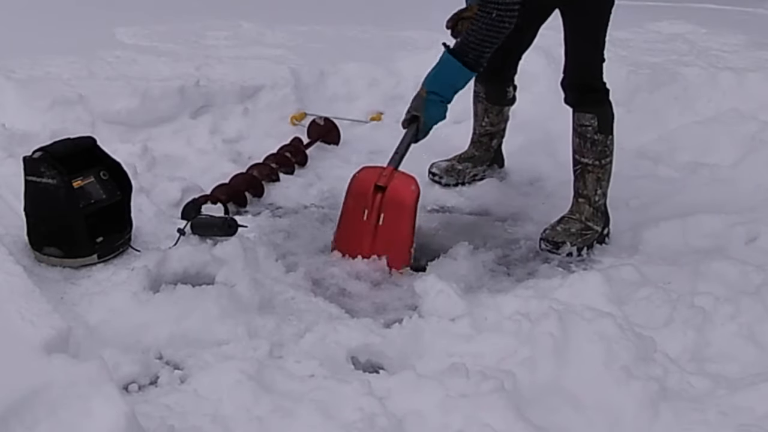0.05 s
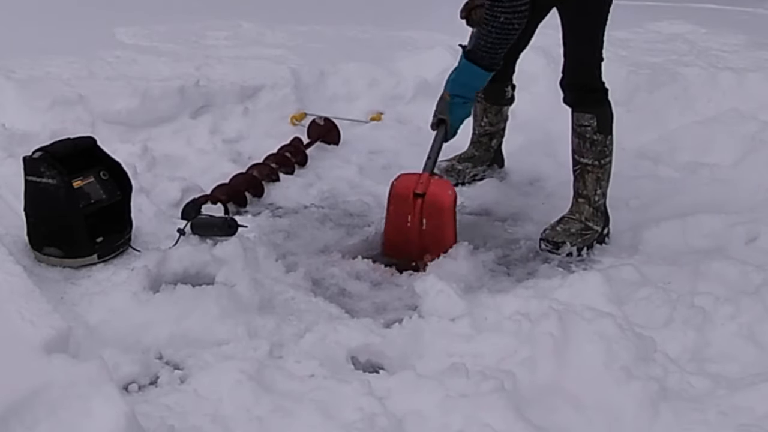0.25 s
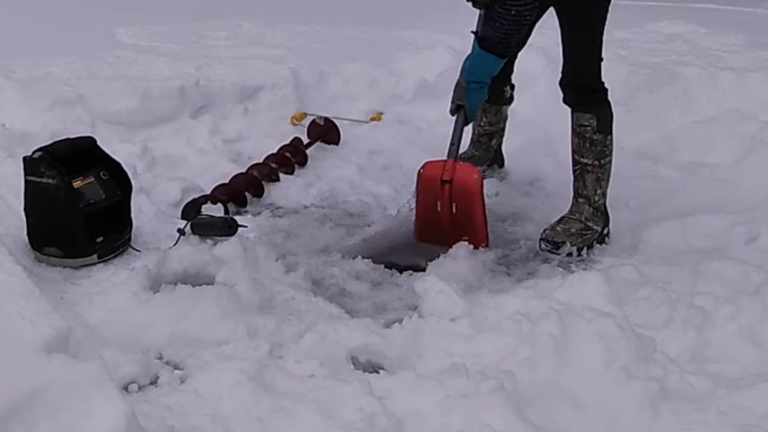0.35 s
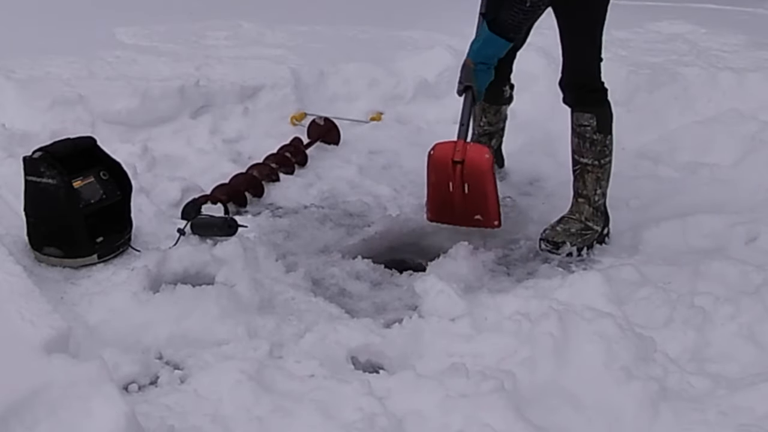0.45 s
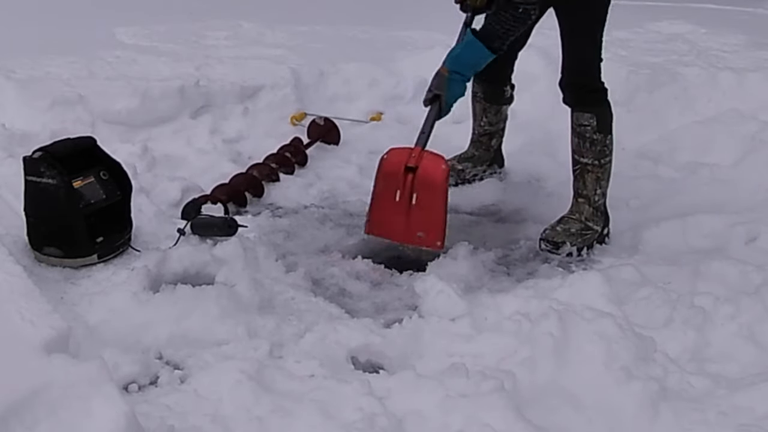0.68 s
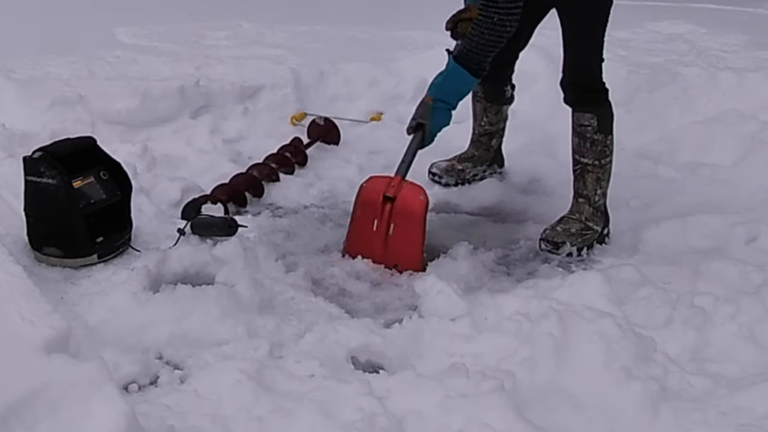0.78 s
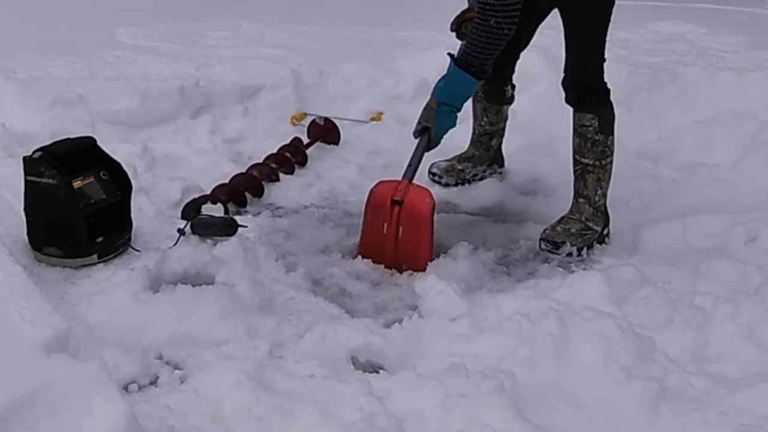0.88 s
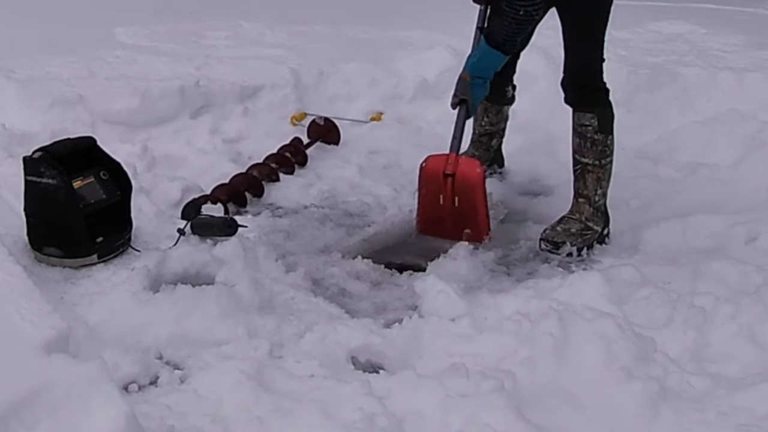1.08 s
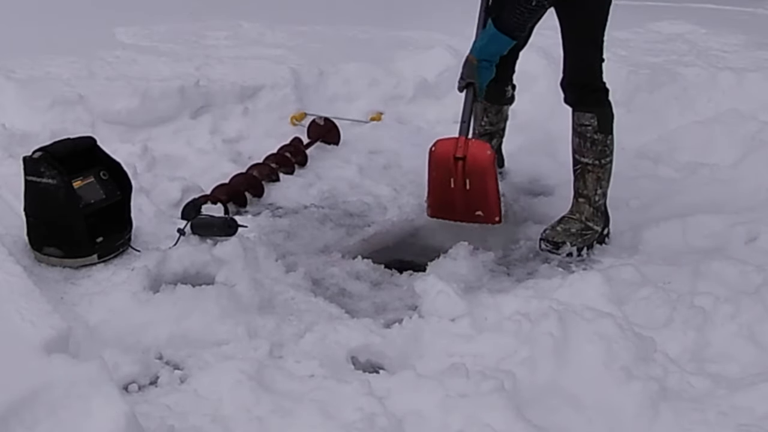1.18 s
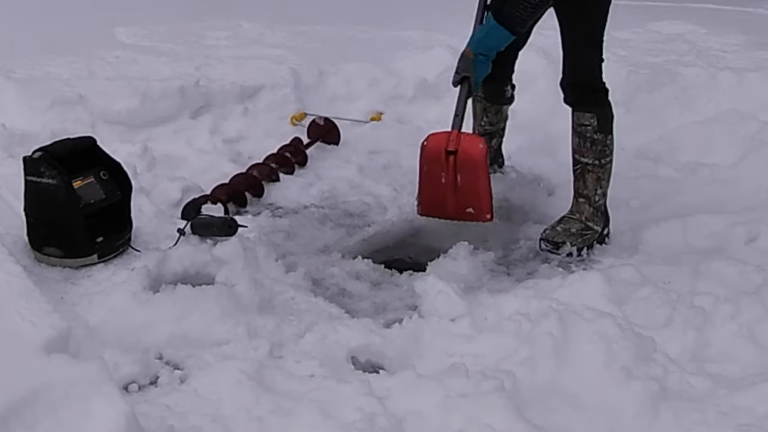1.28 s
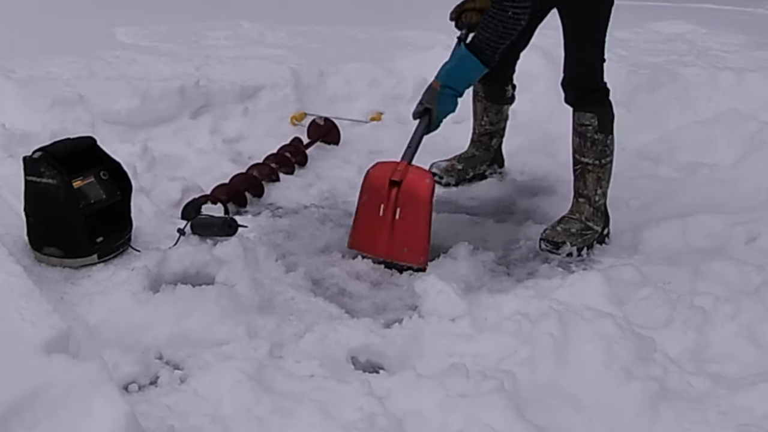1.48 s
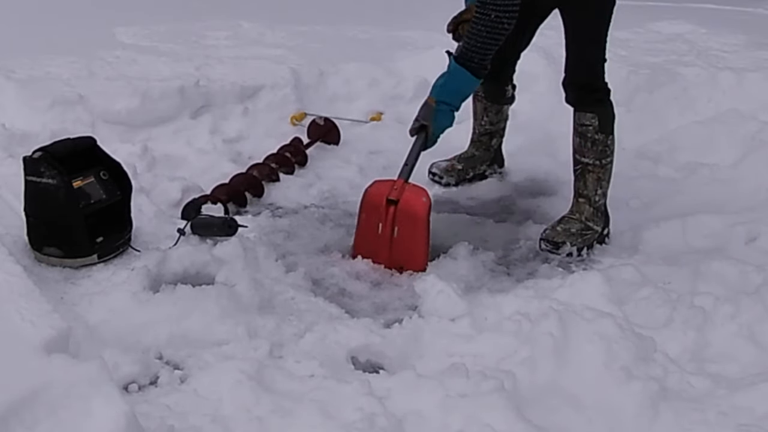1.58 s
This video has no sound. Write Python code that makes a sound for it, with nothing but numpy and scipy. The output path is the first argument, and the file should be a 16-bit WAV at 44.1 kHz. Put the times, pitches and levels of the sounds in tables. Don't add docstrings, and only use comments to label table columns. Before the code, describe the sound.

A small plastic shovel chops at a slushy ice hole, close and dry. Faint slush fades until an abrupt change at 0.14 s. Hard hollow knocks and crunches cluster at 0.2-0.45 s, then wet hiss and lighter clicks at 0.54-0.72. A heavy knock lands near 0.95, a crunchy slushy splash at 1.1, brighter knocks and snaps at 1.33-1.42, then fizz trails off. Faint wind puffs; the loudest blows clip.

```python
import sys
import numpy as np
from scipy import signal
from scipy.fft import rfft, irfft
from scipy.io import wavfile
from scipy.ndimage import uniform_filter1d, map_coordinates

SR = 44100
rng = np.random.default_rng(int(sys.argv[2]) if len(sys.argv) > 2 else 0)


def to_wav(s):
    ch = np.atleast_2d(s).T
    pcm = np.round(np.clip(ch, -1, 1) * 32767)
    wavfile.write(sys.argv[1], SR, pcm.astype(np.int16))


def makeup_ratio(level_db):
    decades = np.asarray(level_db, float) / 20
    return 10 ** decades


N = 72765

# [t/s, half length/s, level/dB]
PUFFS = [
    (0.023, 0.0099, 23),
    (0.952, 0.068, 27),
    (1.23, 0.069, 17.5),
]
# [t/s, flow level/dB, lump level/dB]
SLUSH_FLOW = [(.14, -35, -17), (0.199, -33, -10), (.212, -42, -4), (.3, -34, 1), (0.452, -28, -12.5),
              (.485, -37, -3), (.57, -34.5, -8), (0.628, -30, -13), (.69, -30, -38), (.8, -32.5, -53),
              (.92, -36.5, -21), (1.02, -41.5, -9.5), (1.111, -22.5, -14.5), (1.214, -37, -8),
              (1.3, -32.5, -6.5), (1.44, -31, -13), (1.53, -30.5, -79.5), (1.65, -36, -52)]
# [f/Hz, level/dB]
FIZZ_SPECTRUM = [(300, -30), (900, -6), (1500, 6), (2500, 7.5), (4500, -4), (8000, -2.5), (12000, -12),
                 (16000, -23)]
# [f/Hz, level/dB]
LUMP_SPECTRUM = [(90, -31.5), (160, -8.5), (400, -4), (650, 2.5), (1100, -6.5), (1600, -1), (3000, -54)]
# [t/s, length/s, level/dB, centre f/Hz]
CRUNCHES = [(0.228, .016, -31.5, 2050), (0.239, 0.02, -16.5, 2450), (0.247, 0.034, -11.5, 2140),
            (0.316, 0.0065, -27, 2040), (0.349, 0.023, -21.5, 2040), (0.376, 0.019, -20.5, 2600),
            (.399, 0.011, -15.5, 2270), (0.318, 0.038, -28, 2110), (0.435, 0.034, -24.5, 2150),
            (0.584, 0.067, -25.5, 1520), (0.625, 0.036, -22, 2020), (0.666, 0.0098, -29, 1190),
            (0.707, 0.068, -31, 2530), (0.926, 0.039, -21, 2210), (0.945, 0.048, -22.5, 2050),
            (1.092, 0.0044, -24, 1860), (1.099, 0.008, -14, 2130), (1.131, 0.013, -24, 2160),
            (1.235, 0.021, -29, 1440), (1.281, 0.01, -53, 1490), (1.326, 0.034, -23, 1670),
            (1.341, 0.029, -23.5, 2600), (1.358, 0.049, -20.5, 2480), (1.385, 0.064, -34, 1510)]
# [t/s, peak level/dB, f/Hz, length/s]
SNAPS = [(.0664, -22, 6000, .0015), (.143, -24, 2500, .002), (.1432, -25, 9700, .002),
         (.2115, -26, 2400, .003), (.9515, -9, 1400, .003), (1.042, -29, 2000, .004),
         (.9265, -21, 1550, .008), (.519, -31, 9500, .003), (.5402, -15, 4300, .002),
         (.5404, -17, 8200, .002), (.6002, -16, 2500, .0015), (.6375, -11, 2500, .0015),
         (.7095, -20, 4050, .008), (.711, -25, 9200, .004), (.722, -22, 1900, .006),
         (.789, -27, 11500, .004), (1.031, -25, 1900, .004), (1.0985, -19, 9500, .004),
         (1.1035, -11, 2700, .004), (1.138, -17, 6000, .0015), (1.2502, -18, 4200, .002),
         (1.299, -23, 1550, .01), (1.3265, -10, 1900, .0015), (1.3455, -11, 2300, .002),
         (1.3622, -2, 2300, .0013), (1.3672, -11, 1800, .003), (1.408, -9, 1500, .002),
         (1.535, -28, 6500, .004), (.322, -15, 1600, .002), (.354, -15, 1800, .003),
         (.4038, -9, 1700, .003), (1.3385, -16, 3500, .003), (1.342, -14, 2000, .002),
         (1.357, -13, 2200, .0015), (1.0898, -13, 1700, .002), (1.0925, -14, 2000, .002),
         (1.0958, -12, 2100, .0015), (1.0982, -10, 1900, .002), (1.1015, -11, 2000, .003),
         (.592, -22, 1300, .006), (.6125, -18, 1600, .005), (.3045, -21, 2300, .003),
         (.31, -20, 2300, .003), (.394, -19, 2000, .004), (1.244, -24, 3500, .002),
         (1.212, -30, 9000, .002), (.397, -26, 9000, .002), (.672, -27, 9000, .002),
         (1.563, -28, 6500, .002)]
# [f/Hz, level/dB]
GRIT_SPECTRUM = [(150, -45), (500, -6.5), (1200, 7), (3000, -4.5), (6000, -5.5), (10000, -12),
                 (16000, -12.5)]
# [t/s, peak level/dB, f/Hz, t60/s, push on the shaft/dB]
BLADE_KNOCKS = [(0.2115, -30, 764, 0.019, -12), (0.241, -21.5, 693, 0.09, -4),
                (0.2506, -3, 610.7, 0.072, 2), (.264, -16, 400, 0.042, 0), (0.279, -7, 572, 0.022, -8),
                (.304, -32, 570, 0.029, -12), (0.3215, -6.5, 530, 0.014, -13), (.327, -16, 655, 0.018, -7),
                (0.3528, -3, 473, 0.013, -9), (.358, -23, 520, 0.022, -12), (.369, -21.5, 493, 0.028, 0),
                (0.404, -11, 466, 0.026, 0), (0.4093, -21, 491, 0.033, -17), (0.436, -14, 442, 0.013, -4.5),
                (0.544, -30, 537, 0.031, 1), (.587, -28, 590, 0.017, -16), (0.624, -16.5, 529, 0.028, -13),
                (0.64, -17, 1110, 0.023, -7), (.644, -16.5, 736, 0.027, -8),
                (0.6469, -16.5, 1340, 0.016, 3.5), (0.651, -21, 880, 0.033, -15),
                (0.667, -22, 1180, 0.029, -6), (0.788, -34, 615, 0.038, -9), (0.9322, -19, 630, 0.039, 0),
                (0.9465, -13, 608, 0.054, 8), (0.9497, -13, 360, 0.016, 1), (0.955, -19.5, 703, 0.031, 4.5),
                (0.9651, -2.5, 579, 0.033, -6.5), (1.0894, -17.5, 475, 0.024, -6),
                (1.098, -26, 450, 0.025, 1.5), (1.108, -18.5, 427, 0.022, 2.5),
                (1.136, -34, 410, 0.023, -7), (1.3269, -26, 1235, 0.038, -15),
                (1.343, -20, 800, 0.017, -10), (1.351, -16.5, 756, 0.015, 3),
                (1.3755, -12, 787, 0.028, -12), (1.38, -7, 1082, 0.024, -4.5),
                (1.391, -17, 1190, 0.019, -12), (1.402, -19, 957, .03, -18),
                (1.417, -20.5, 1270, 0.02, -16)]
# [f ratio to the knock, level/dB, share of its t60]
SCOOP_MODES = [(1.12, -13, .4), (1.85, -8, .6), (2.9, -17, .5), (4.2, -22, .4)]
# [f/Hz, level/dB, t60/s]
SHAFT_MODES = [(155, -25, .07), (320, -41, .3), (600, -37, .25), (370, -13, .03)]
# [t/s, half length/s, level/dB]
WIDE_MOMENTS = [
    (0.069, 0.005, -18),
    (0.234, 0.017, -20.5),
    (0.393, 0.02, -18),
    (1.11, 0.02, -18.5),
]
# [f/Hz, gain/dB]
MIC_RESPONSE = [(100, -17), (150, -3.5), (5200, 2.5), (5900, -2.5), (9900, 3.5), (10700, -8.5),
                (14500, -16), (15600, -34)]
# [f/Hz, gain/dB]
SIDE_RESPONSE = [(9000, -62), (11200, -37), (11700, -7.5), (12900, -3), (13600, -22), (15000, -30)]

CHANGE_S, BEFORE_DB = .1425, -38.5
FADE_FROM_S, FADE_DB_PER_S = 0.039, 143
FAR_DB = -42.5
RUMBLE_DB, RUMBLE_HZ, MURMUR_DB = -66.5, 40.5, -65.5
THUD_HZ, THUD_DB, THUD_T60_S, RISE_S = 231.5, -4.5, 0.018, 0.0014
SHAKE, SCATTER_DB = .25, 2.5
ECHO_DB, ECHO_T60_S = -15, .05
NOTCH_HZ, NOTCH_WIDTH_HZ, NOTCH_DB = 7556, 316, -12.5
WIDE_FROM_HZ = 1000
CLIP_LEVEL = 1.0


def unit(x):
    return x / np.sqrt(np.mean(x ** 2) + 1e-20)


def along(points, hz):
    f, v = np.transpose(points)
    return np.interp(np.log(hz + 1), np.log(f + 1), v)


def wobble(rate):
    knots = rng.standard_normal(int(N * rate / SR) + 4)
    return map_coordinates(knots, [np.arange(N) * rate / SR])


def coloured(x, db_of):
    m = 2 ** 17
    gain = makeup_ratio(db_of(np.fft.rfftfreq(m, 1 / SR)))
    cepstrum = irfft(np.log(gain + 1e-6), m)
    cepstrum[1:m // 2] *= 2
    cepstrum[m // 2 + 1:] = 0
    return irfft(rfft(x, m) * np.exp(rfft(cepstrum)), m)[..., :N]


def noise(points):
    return coloured(rng.standard_normal(N), lambda f: along(points, f))


def bumps(table, power):
    t = np.arange(N) / SR
    return sum(height * np.exp(-((t - s) / width) ** power) for s, width, height in table)


def grains(count, hz, spread, cycles, size_db, n=N):
    u, z = rng.random((count, 2)), rng.standard_normal(count)
    f = np.clip(hz * np.exp(spread * z), 200, 15000)[:, None]
    t = np.arange(160) / SR
    size = makeup_ratio(-size_db * np.log(u[:, 1:] + 0.014)) * np.sqrt(f)
    g = size * np.sin(2 * np.pi * f * t) * np.exp(-f * t / cycles)
    at = (u[:, :1] * n).astype(int) + np.arange(160)
    return unit(np.bincount(at.ravel(), g.ravel(), n + 160)[:n])


def air():
    low = coloured(rng.standard_normal(N), lambda f: -30 * np.log10(1 + (f / RUMBLE_HZ) ** 2))
    murmur = noise([(80, -18), (160, 4.5), (400, -7), (1200, -29)])
    rumble_db = RUMBLE_DB + bumps(PUFFS, 2) + 2.2 * wobble(9.7)
    return makeup_ratio(rumble_db) * unit(low) + makeup_ratio(MURMUR_DB) * unit(murmur)


def slush():
    s, flow, weight = np.transpose(SLUSH_FLOW)
    t = np.arange(N) / SR
    fading = BEFORE_DB - FADE_DB_PER_S * np.clip(t - FADE_FROM_S, 0, 1)
    level = np.where(t < CHANGE_S, fading, np.interp(t, s, flow))
    level = level + .9 * wobble(35.96) + 2.1 * wobble(130)
    hiss = unit(noise(FIZZ_SPECTRUM))
    crackle = grains(count=3000, hz=2600, spread=0.536, cycles=7.9, size_db=3.5)
    uneven = rng.standard_normal(N) * makeup_ratio(1.6 * wobble(59.4))
    lumps = unit(coloured(uneven, lambda f: along(LUMP_SPECTRUM, f)))
    drips = grains(count=500, hz=2100, spread=.55, cycles=5, size_db=2)
    far = unit(noise([(1500, -56), (4000, 14.0), (9000, 1.0), (15000, 5)]))
    far = far * makeup_ratio(FAR_DB + np.where(t < CHANGE_S, level - BEFORE_DB, 0))
    near = 0.26 * drips + 0.61 * hiss + 0.34 * crackle + makeup_ratio(np.interp(t, s, weight)) * lumps
    return far + makeup_ratio(level) * near


def crunches():
    out = np.zeros(N + SR)
    uneven = rng.standard_normal(N) * makeup_ratio(2.1 * wobble(400))
    grit = unit(coloured(uneven, lambda f: along(GRIT_SPECTRUM, f)))
    for s, length, db, hz in CRUNCHES:
        u, i = np.arange(3000) / (length * SR), round(s * SR)
        shape = np.clip(u / 0.2, 0, 1) * np.exp(-1.6 * u ** 2)
        cracks = grains(count=200, hz=hz, spread=0.39, cycles=2.3, size_db=4, n=len(u))
        out[i:i + len(u)] += makeup_ratio(db) * shape * 0.54 * (cracks + grit[i:i + len(u)])
    return out[:N]


def snaps():
    out, t = np.zeros(N + SR), np.arange(900) / SR
    for s, db, hz, length in SNAPS:
        resonance = np.cos(2 * np.pi * hz * t) * np.exp(-1.8 * hz * t)
        rough = np.convolve(rng.standard_normal(len(t)), resonance)[:len(t)]
        snap = .5 * np.sin(2 * np.pi * hz * t) + .5 * unit(rough)
        envelope = makeup_ratio(db + 3 - 20 * t / length) * (1 - np.exp(-3 * hz * t))
        out[round(s * SR):][:len(t)] += envelope * snap
    return out[:N]


def shaft(hz, detune, t):
    thud_hz = THUD_HZ * (1 + 0.14 * detune)
    thud = makeup_ratio(THUD_DB - 60 * t / THUD_T60_S) * np.sin(2 * np.pi * thud_hz * t)
    modes = sum(makeup_ratio(db - 60 * t / t60) * np.sin(2 * np.pi * f * t) for f, db, t60 in SHAFT_MODES)
    return (600 / hz) ** 2 * thud + 600 / hz * modes


def blade():
    out, t = np.zeros(N + SR), np.arange(SR // 5) / SR
    for s, db, hz, t60, push_db in BLADE_KNOCKS:
        r = rng.standard_normal((len(SCOOP_MODES), 3))
        ring = np.sin(2 * np.pi * hz * t) * makeup_ratio(-60 * t / t60)
        for (ratio, level, share), (louder, detune, phase) in zip(SCOOP_MODES, r):
            mode_hz = hz * ratio * (1 + 0.083 * detune)
            decay = makeup_ratio(level + SCATTER_DB * louder - 60 * t / (t60 * share))
            ring = ring + decay * np.sin(2 * np.pi * mode_hz * t + phase)
        ring = ring * (1 + SHAKE * unit(uniform_filter1d(rng.standard_normal(len(t)), size=60)))
        knock = ring + makeup_ratio(push_db) * shaft(hz, r[0, 2], t)
        out[round(s * SR):][:len(t)] += makeup_ratio(db + 5) * knock * (1 - np.exp(-t / RISE_S))
    return out[:N]


def snow_echo(near):
    t = np.arange(4000) / SR
    tail = rng.standard_normal(len(t)) * makeup_ratio(-60 * t / ECHO_T60_S)
    return makeup_ratio(ECHO_DB) * signal.fftconvolve(near, tail / np.linalg.norm(tail))[:N]


def microphone(x):
    def response(f):
        return along(MIC_RESPONSE, f) + NOTCH_DB * np.exp(-((f - NOTCH_HZ) / NOTCH_WIDTH_HZ) ** 2)
    return coloured(x, response)


def side_signal(mid):
    other = mid * unit(wobble(250))
    widening = bumps([(s, width, makeup_ratio(db)) for s, width, db in WIDE_MOMENTS], 4)
    wide = coloured(other, lambda f: -40 * np.log10(1 + (WIDE_FROM_HZ / (f + 1)) ** 2))
    return coloured(other, lambda f: along(SIDE_RESPONSE, f)) + widening * wide


def scene():
    near = blade() + (crunches() + snaps())
    echo = snow_echo(near)
    mid = microphone(near + slush() + echo)
    side = side_signal(mid)
    mid = mid + air()
    return np.array([mid + side, mid - side])


def low_pass(x):
    return signal.sosfilt(signal.butter(12, 15700, fs=SR, output="sos"), x)


def record(dry):
    clipped = dry / (1 + np.abs(dry / CLIP_LEVEL) ** 8) ** (1 / 8)
    return low_pass(clipped)


dry = scene()
out = record(dry)
to_wav(out)
```